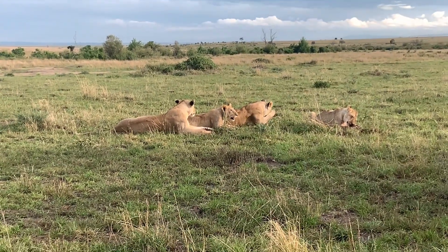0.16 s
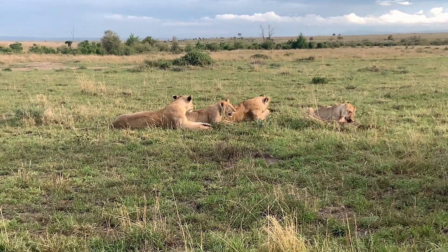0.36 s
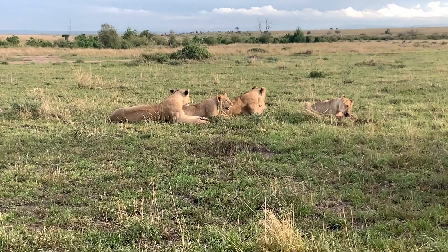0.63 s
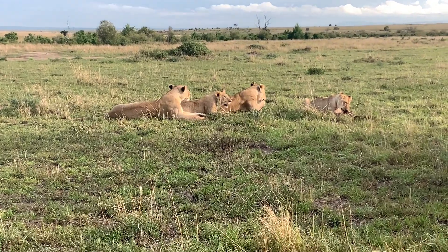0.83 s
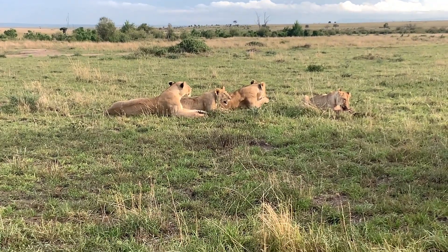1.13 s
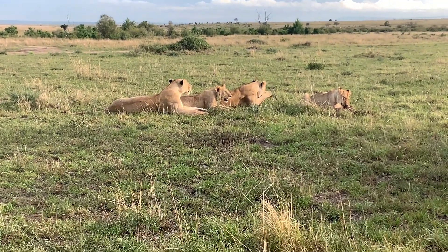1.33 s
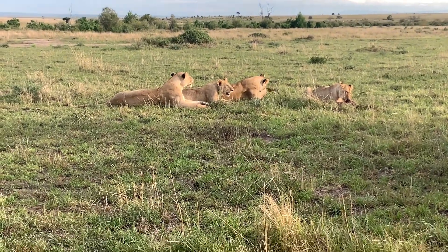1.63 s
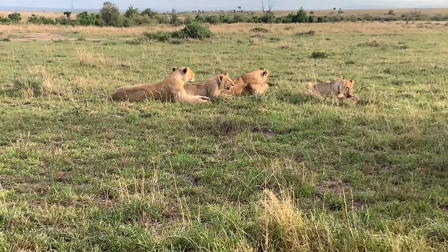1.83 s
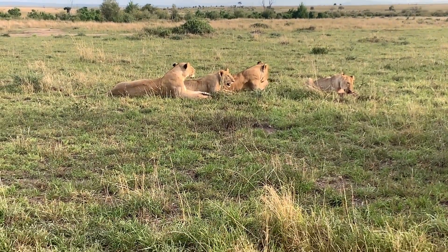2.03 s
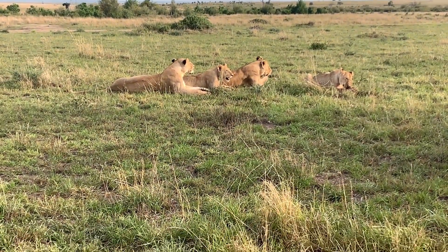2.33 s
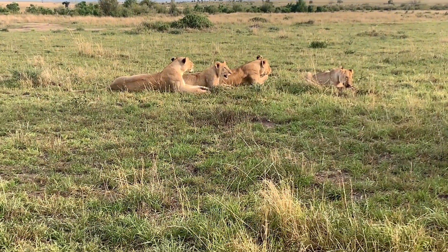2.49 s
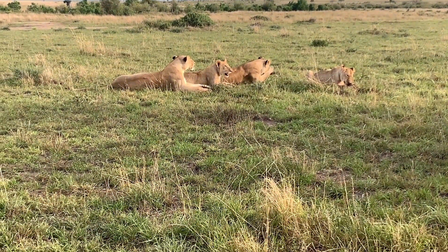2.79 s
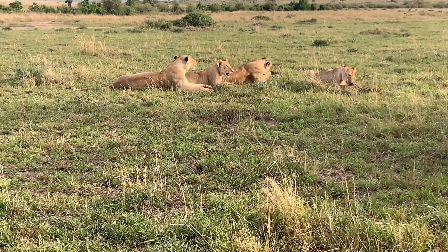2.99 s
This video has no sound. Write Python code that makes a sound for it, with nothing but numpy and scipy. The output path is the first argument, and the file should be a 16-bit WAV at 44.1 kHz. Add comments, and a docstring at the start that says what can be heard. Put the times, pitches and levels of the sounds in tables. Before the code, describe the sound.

Heard close up from a vehicle standing on open grassland, its engine starts: a short rasp and a clunk, loose fittings rattling as the body shudders, then a low humming idle with light pulsing clatter.

```python
"""Engine catching and idling

Heard from the standing vehicle: a short starter rasp ends in a clunk, fittings rattle and the body
shudders. The exhaust settles into a low boom on the third multiple of the firing rate, under ringing
panels and a light clatter and hiss that pulse with each firing."""
import sys
import numpy as np
from scipy import signal
from scipy.fft import rfft, irfft
from scipy.io import wavfile

SR = 44100
rng = np.random.default_rng(int(sys.argv[2]) if len(sys.argv) > 2 else 0)


def unload_audio(sound):
    """Save the sound as a 16-bit wav file, at the path given as the first command line argument."""
    columns = np.transpose(np.atleast_2d(sound))
    # keep every value between -1 and 1, then stretch to whole-number steps
    steps = np.round(np.clip(columns, -1, 1) * 32767)
    wavfile.write(sys.argv[1], SR, steps.astype(np.int16))


N = 138915
TIME = np.arange(N) / SR
HZ = np.fft.rfftfreq(N, 1 / SR)

# engine speed (time [s], firing rate [Hz])
FIRING_RATE = [(0, 30), (0.7, 31), (0.9, 33), (1.25, 33.7), (1.6, 33.05), (2.4, 32.7), (3.15, 32.1)]
def firing_count():
    """The engine's pulse: a running count of firings."""
    firings = np.cumsum(np.interp(TIME, *np.transpose(FIRING_RATE))) / SR
    return firings - np.interp(2.003, TIME, firings) % 1 + 2  # one cycle starts at 2.003 s


# exhaust tones (harmonic, level [dB], entry [s], fade-in [s], level waver [dB], phase waver [turns])
EXHAUST_TONES = [(1, -56.5, 0.65, .25, 6, 0.03), (2, -42.5, 0.48, 0.36, 0.9, 0.03),
                 (3, -30.5, 0.85, 0.12, .5, 0.024), (6, -52, 0.81, 0.057, -2, 0.14)]
# the boom sags and recovers (time [s], gain [dB])
BOOM_RIDE = [(1.1, 1), (1.23, -2.5), (1.29, 0.5), (1.37, -3), (1.5, -1), (1.65, 1), (1.95, -0.5), (2.1, .5),
             (2.82, 0.8), (2.92, -0.5), (3.15, -1.5)]
def exhaust_hum(firings):
    """Low multiples of the firing rate swell in one after another."""
    out = np.zeros(N)
    for harmonic, db, entry, fade, waver_db, slip in EXHAUST_TONES:
        level = np.clip((TIME - entry) / fade, 0, 1) * amp(db + waver_db * waver(rate_hz=20))
        if harmonic >= 3:
            level *= amp(np.interp(TIME, *np.transpose(BOOM_RIDE)))
        turns = harmonic * firings + slip * waver(rate_hz=6.2)
        out += level * np.sqrt(2) * np.sin(2 * np.pi * turns)
    return out


# engine noise colour (frequency [Hz], relative level [dB])
ENGINE_EQ = [(130, 2.5), (190, -3), (260, -5.5), (330, -16), (430, -20.5), (520, -18), (640, -20),
             (780, -21.5), (1000, -29.5), (1250, -26.5), (1400, -20), (1560, -16), (1900, -22),
             (2300, -24.5), (2700, -26.5), (3400, -28), (4200, -31), (5500, -37), (7000, -36.5),
             (8300, -39), (11000, -31.5), (15000, -35.5)]
# pulsing bands (low [Hz], high [Hz], level at 2 s [dB], peak position [cycles], attack width [cycles],
# steady share [0-1], puff scatter [dB], drift [dB/s])
ENGINE_BANDS = [(119.6, 318, -46, 0.7, 0.1, 0.94, 2, 0.33), (318, 1270, -52, 0.4, 0.4, 0.85, 2.5, -.5),
                (1120, 2440, -55, 0.3, 0.24, 0.3, 2.5, 0), (2130, 5000, -60.5, 0.34, 0.24, 0.63, 4.9, -3.5),
                (4870, 15300, -58, 0.14, 0.24, 0.42, 2.5, -0.9)]
def engine_clatter(firings):
    """Knock and hiss: each noise band puffs once per firing, never quite alike."""
    out = np.zeros((2, N))
    for low, high, db, position, width, steady, scatter_db, drift in ENGINE_BANDS:
        band = colour(ENGINE_EQ) / np.sqrt((1 + (low / (HZ + 1)) ** 20) * (1 + (HZ / high) ** 20))
        cycle = firings - position + .5
        strength = amp(scatter_db * rng.standard_normal(200))[cycle.astype(int)]
        age = cycle % 1 - .5
        spread = width * np.where(age < 0, 1, 2)  # the tail is twice the attack
        puffs = steady + (1 - steady) * strength * np.exp(-.5 * (age / spread) ** 2)
        catch_db = 1.5 * np.exp(-TIME ** 4) * low / (low + 1000)  # brighter for the first second
        out += noise(band) * evened(puffs) * amp(db + catch_db + drift * (TIME - 2))
    return out


# rasp envelope (time [s], level [dB])
RASP_ENVELOPE = [(0, -35.5), (.03, -36), (0.061, -32), (.095, -36), (.125, -43.5), (.17, -60), (0.238, -47)]
# rasp colour (frequency [Hz], relative level [dB])
RASP_EQ = [(150, -13), (250, 1.5), (380, -10), (500, -4), (640, -4.5), (780, 1.5), (1000, -8), (1400, -3),
           (1750, -8.5), (2000, -13), (2700, -8.5), (3500, -14), (5500, -26.5), (8000, -19.5),
           (11000, -25.5), (15000, -28)]
# short whines (pitch at peak [Hz], glide [octaves/s], peak time [s], half length [s], level [dB])
STARTER_WHINES = [(1591, -3, 0.045, 0.012, -32.5), (493.4, -4.5, 0.066, 0.012, -31.5),
                  (1770, -1.5, .093, 0.011, -36.5), (2196, -1, 0.071, 0.017, -31),
                  (193.8, -3, 0.118, 0.018, -33), (1740, -2, 0.0297, 0.018, -38),
                  (795, -3.5, 0.0671, 0.015, -37), (1370, -1.5, .085, 0.0092, -37.5),
                  (1150, -2.5, 0.0526, 0.014, -41), (305.4, 0, 0.065, 0.014, -40)]
def starter(teeth_hz=230, teeth_depth=0.19, pitch_jitter=0.018):
    """Gear teeth rasp and whine as the starter runs down."""
    teeth = np.cumsum(teeth_hz * (1 + 0.19 * waver(rate_hz=60))) / SR
    grit = evened(1 + teeth_depth * np.cos(2 * np.pi * teeth))
    times, levels = np.transpose(RASP_ENVELOPE)
    envelope = amp(np.interp(TIME, times, levels)) * (TIME < times[-1])
    out = noise(colour(RASP_EQ)) * grit * envelope
    for hz, glide, peak, half, db in STARTER_WHINES:
        age = np.clip(TIME - peak, -1, .5)
        pitch = hz * 2 ** (glide * age) * (1 + pitch_jitter * waver(rate_hz=82))
        out += amp(db) * swell(peak, half) * np.sin(2 * np.pi * np.cumsum(pitch) / SR)
    return out


# clunk cue (time [s], level [dB])
CLUNK_HITS = [(0.2607, -28.5)]
# impact colour (frequency [Hz], relative level [dB])
CLUNK_EQ = [(150, -26), (350, -13), (510, 7), (780, 9.5), (1000, -30), (1280, 16), (1700, -27), (2600, 7),
            (3400, -21), (4100, -21), (5300, -26), (7000, -17), (11000, -10), (15000, -33)]
# metal ring-out (pitch [Hz], level relative to the hit [dB], t60 [s])
CLUNK_RING = [(377, -14, 0.048), (500, -2.5, 0.15), (723, -11, 0.27), (1276, -1, 0.11), (2100, -13, 0.079),
              (2730, -18, 0.11), (4130, -21, 0.11)]
def clunk(attack_s=0.0042, decay_s=0.011, buzz_turns=0.073):
    """The starter drops out and strikes metal; loose contact roughens each mode."""
    out = noise(colour(CLUNK_EQ)) * sum(amp(db) * burst(s, attack_s, decay_s) for s, db in CLUNK_HITS)
    for start, db in CLUNK_HITS:
        for hz, mode_db, t60 in CLUNK_RING:
            out += amp(db + mode_db) * ring(start, hz, attack_s, t60, buzz_turns * waver(rate_hz=65))
    return out


# body thumps (time [s], pitch [Hz], level [dB], attack [s], t60 [s])
THUMPS = [(0.169, 93.9, -39, 0.024, 0.8), (0.291, 102, -41, 0.017, 0.29), (0.391, 71.4, -38.5, 0.02, 0.22),
          (0.463, 90.8, -32.5, 0.0085, 0.34), (0.477, 162.4, -29.5, 0.012, 0.14),
          (0.546, 101.5, -25.5, 0.0039, 0.44), (0.548, 145, -28.5, 0.003, 0.031),
          (.69, 100.6, -32, 0.032, 0.086), (0.804, 168, -33.5, 0.0034, 0.084),
          (1.614, 164, -30, 0.0037, 0.089)]
def shudders():
    """The body thumps dully on its springs and mounts."""
    return sum(amp(db) * ring(s, hz, attack, t60) for s, hz, db, attack, t60 in THUMPS)


# rattle cues (time [s], level [dB], attack [s], decay [s])
RATTLE_HITS = [(0.255, -35, 0.0042, 0.037), (0.349, -35.5, 0.036, 0.027)]
# rattle colour (frequency [Hz], relative level [dB])
RATTLE_EQ = [(200, -5), (500, -4.5), (780, -2.5), (1100, -6.5), (1500, -1), (1950, -11), (2250, -0.5),
             (2700, -8.5), (3500, -10.5), (4100, -6), (5300, -20), (6800, -14.5), (11000, -15.5),
             (15000, -17)]
def rattles():
    """Loose fittings shake in bright bursts."""
    grit = evened(amp(0.53 * waver(rate_hz=220)))
    envelope = sum(amp(db) * burst(s, attack, decay) for s, db, attack, decay in RATTLE_HITS)
    return noise(colour(RATTLE_EQ)) * grit * envelope


# click cues (time [s], level [dB])
CLICK_HITS = [(0.422, -44.5), (0.4597, -39), (0.4633, -42), (0.535, -37.5), (1.071, -51), (2.53, -43)]
# click colour (frequency [Hz], relative level [dB])
CLICK_EQ = [(500, -5), (1500, 2), (3000, -5), (4200, -5), (5400, -11), (6600, -3.5), (7600, -5), (9500, -9),
            (11300, -5.5), (12500, -10), (15000, -13)]
def clicks(attack_s=0.00079, decay_s=0.0045):
    """Small metal parts click dryly."""
    return noise(colour(CLICK_EQ)) * sum(amp(db) * burst(s, attack_s, decay_s) for s, db in CLICK_HITS)


# chatter cues (time [s], level [dB])
CHATTER_HITS = [(.196, -51), (.368, -43), (.64, -48.5), (1.016, -54), (1.126, -49.5), (1.31, -51),
                (1.473, -47.5), (1.53, -50), (1.653, -46.5), (1.743, -45.5), (1.832, -48.5), (1.861, -54),
                (2.198, -45), (2.38, -49.5), (2.437, -57), (2.565, -53), (2.959, -51.5)]
# chatter colour (frequency [Hz], relative level [dB])
CHATTER_EQ = [(1000, -68), (1350, 1), (1560, 8.5), (1850, -3), (2300, -1.5), (3000, -48), (6000, -44)]
def chatter(half_s=0.011):
    """A loose panel gives short buzzes."""
    return noise(colour(CHATTER_EQ)) * sum(amp(db) * swell(s, half_s) for s, db in CHATTER_HITS)


def tink():
    """A small metal part is tapped once."""
    return amp(-48) * ring(start=2.532, hz=4798, attack=0.00079, t60=0.08)


# panel resonances (pitch [Hz], bandwidth [Hz], level at 1.5 s [dB], drift [dB/s])
PANEL_MODES = [(381.7, 8.3, -58.5, -2), (493, 15, -64.5, -1.5), (725, 37, -62, -0.5),
               (1143, 25, -75.5, -11.5), (1363, 35, -62.5, -3.5), (1558, 16, -70.5, -5.5),
               (2120, 34, -70, 1)]
# the lowest panel sings out (time [s], level [dB], half length [s])
PANEL_SWELLS = [(0.956, -53, 0.039), (1.256, -51, 0.054), (1.683, -48.5, 0.036)]
def panels():
    """Shaken body panels ring narrowly; now and then the lowest swells into a clean tone."""
    rings = np.zeros((2, N))
    for hz, width, db, drift in PANEL_MODES:
        resonance = 1 / (1 + (2 * (HZ - hz) / width) ** 2)
        rings += amp(db + drift * (TIME - 1.5)) * noise(resonance)
    fade_in = np.clip(TIME / 0.88, 0, 1) ** 2
    singing = sum(amp(db) * swell(s, half) for s, db, half in PANEL_SWELLS)
    return rings * fade_in + singing * np.sin(2 * np.pi * PANEL_MODES[0][0] * TIME)


# rumble colour (frequency [Hz], relative level [dB])
RUMBLE_EQ = [(35, -2), (58, -16), (85, 2), (105, -1), (120, -4.5), (200, -30), (500, -73)]
def rumble():
    """The shaking vehicle lays down a steady low bed."""
    return amp(-49.5) * noise(colour(RUMBLE_EQ))


# stereo likeness (frequency [Hz], correlation [0-1])
STEREO_LIKENESS = [(100, 0.96), (300, 1), (700, 0.92), (1400, 0.72), (2800, 0.73), (5000, 0.43), (9000, 1),
                   (15000, 0.67)]
def noise(gain):
    """Coloured noise in two partly alike channels, rms 1."""
    shared, apart = rfft(rng.standard_normal((2, N)))
    likeness = np.clip(curve(STEREO_LIKENESS), 0, 1)
    pair = np.sqrt(1 + likeness) * shared + np.sqrt(1 - likeness) * np.array([apart, -apart])
    return evened(irfft(pair * gain, N))


def amp(db):
    """Decibels to gain."""
    return 10 ** (np.asarray(db) / 20)


def evened(x):
    """Scales to rms 1."""
    return x / np.sqrt(np.mean(x ** 2) + 1e-20)


def curve(points):
    """Joins (Hz, value) points along a log frequency axis."""
    hz, value = np.transpose(points)
    return np.interp(np.log(HZ + 1), np.log(hz), value)


def colour(points):
    """EQ gain from (Hz, dB) points, with a low cut below the first."""
    return amp(curve(points)) / np.sqrt(1 + (0.95 * points[0][0] / (HZ + 1)) ** 8)


def waver(rate_hz):
    """Random wobble up to about rate_hz, rms 1."""
    return evened(irfft(rfft(rng.standard_normal(N)) / (1 + (HZ / rate_hz) ** 4), N))


def swell(peak, half):
    """A bell-shaped rise and fade around one moment."""
    return np.exp(-.5 * ((TIME - peak) / half) ** 2)


def burst(start, attack, decay):
    """Straight attack, exponential decay."""
    age = TIME - start
    return np.clip(age / attack, 0, 1) * np.exp(-np.maximum(age - attack, 0) / decay)


def ring(start, hz, attack, t60, slip=0):
    """One struck mode; slip shifts its phase, in turns."""
    return burst(start, attack, t60 / np.log(1000)) * np.sin(2 * np.pi * (hz * (TIME - start) + slip))


def scene():
    """The mix: running engine, start-up, loose metal and low end."""
    firings = firing_count()
    running = exhaust_hum(firings) + engine_clatter(firings) + chatter() + panels()
    return running + starter() + clunk() + rattles() + clicks() + tink() + shudders() + rumble()


# stereo phase (frequency [Hz], left lead [rad])
STEREO_PHASE = [(0, 0.08), (860, -1.5), (1290, -0.1), (2410, -3.2), (2760, -2.8), (5170, -4.2),
                (6030, -6.7), (6630, -6.6), (7670, -9.1), (8870, -9.6), (10400, -12.1), (13700, -16.0),
                (15200, -18.4), (16500, -19.3)]
# stereo balance (frequency [Hz], left minus right [dB])
STEREO_BALANCE = [(100, 0), (300, -1), (700, 0.5), (1400, 1), (2800, 2), (5500, -5.5), (9000, 1.5),
                  (15000, -1)]
def record(dry, cutoff_hz=15850):
    """The sound reaches the left microphone a little later; a steep high cut trims the top."""
    lead = np.interp(HZ, *np.transpose(STEREO_PHASE))
    left = amp(curve(STEREO_BALANCE) / 2) * np.exp(.5j * lead)
    pair = irfft(rfft(dry) * np.array([left, 1 / left]), N)
    high_cut = signal.firwin(511, cutoff_hz, window=("kaiser", 9), fs=SR)
    return signal.oaconvolve(pair, high_cut[None], "same", axes=1)


dry = scene()
out = record(dry)
unload_audio(out)
```